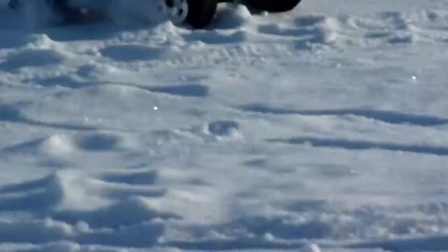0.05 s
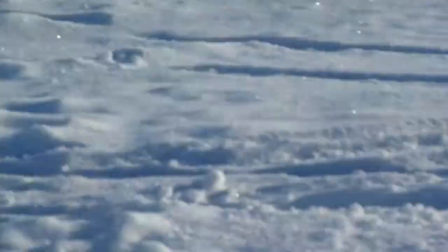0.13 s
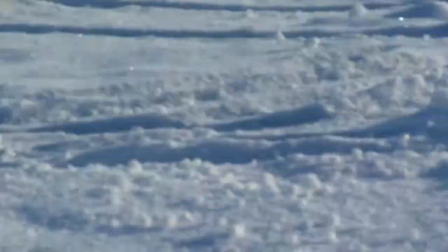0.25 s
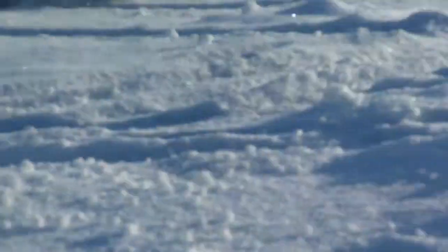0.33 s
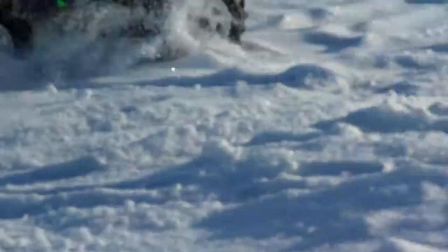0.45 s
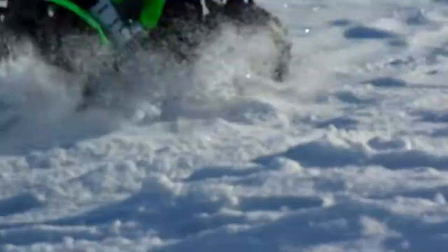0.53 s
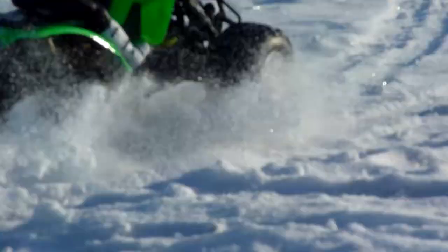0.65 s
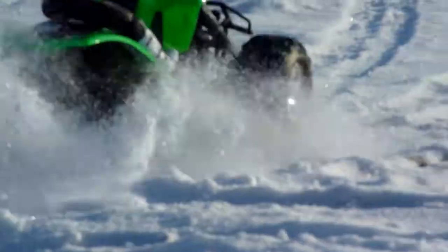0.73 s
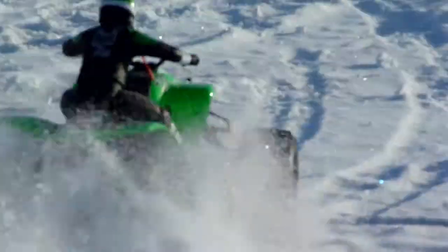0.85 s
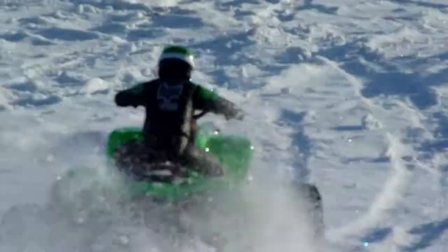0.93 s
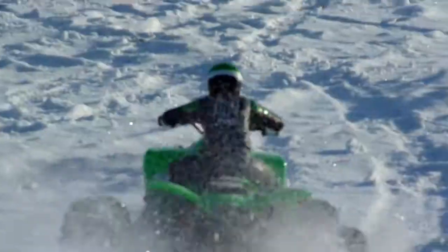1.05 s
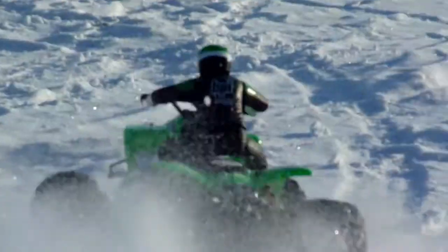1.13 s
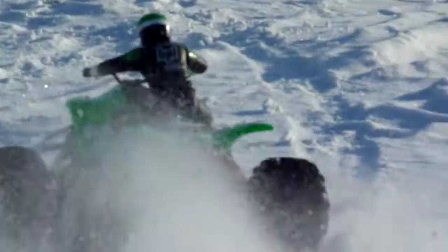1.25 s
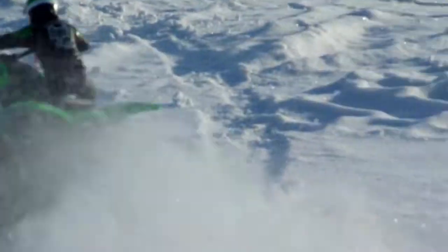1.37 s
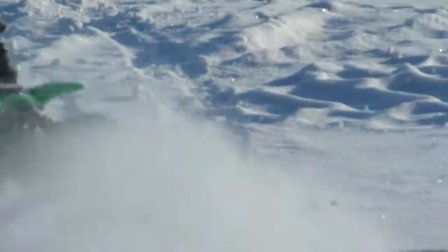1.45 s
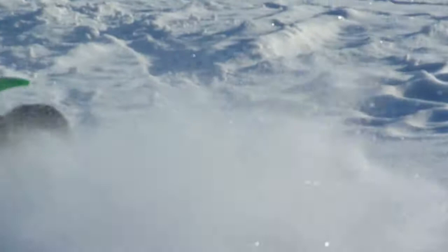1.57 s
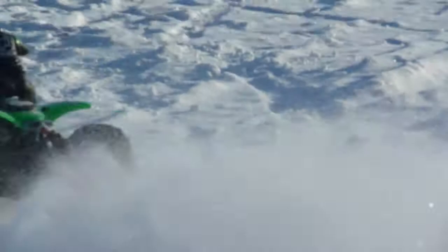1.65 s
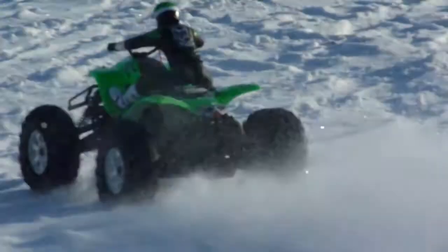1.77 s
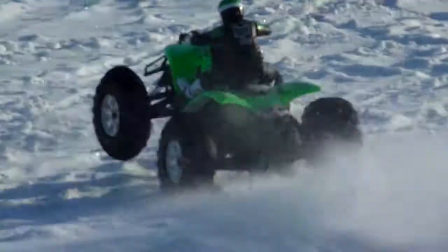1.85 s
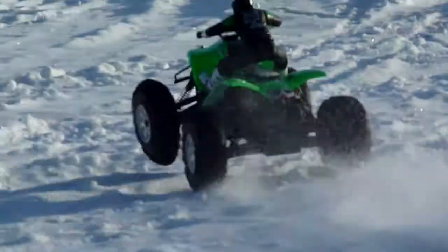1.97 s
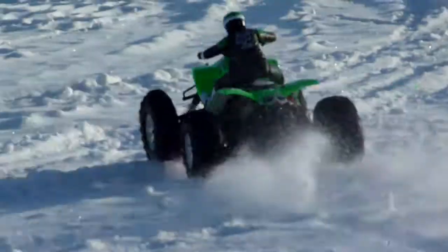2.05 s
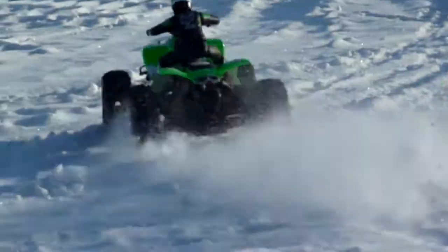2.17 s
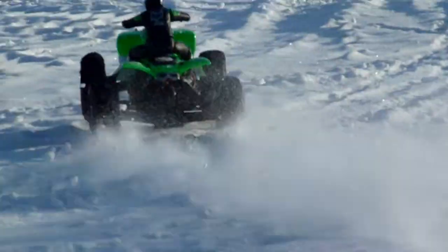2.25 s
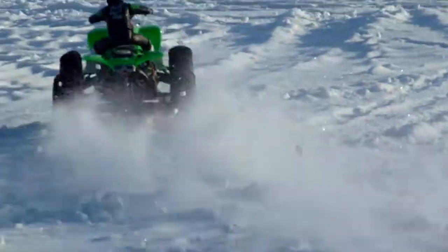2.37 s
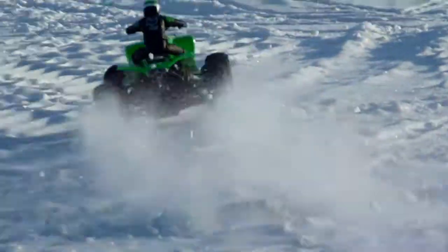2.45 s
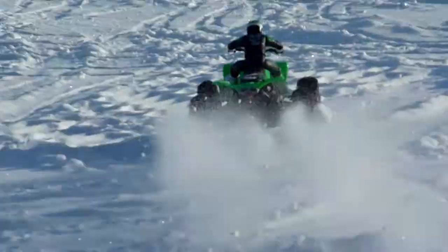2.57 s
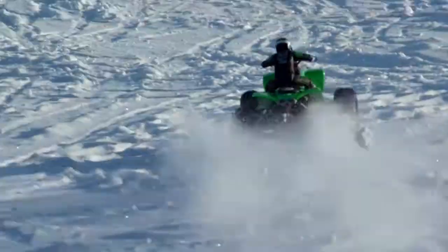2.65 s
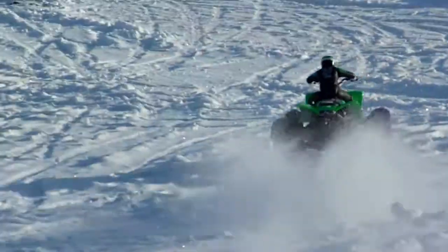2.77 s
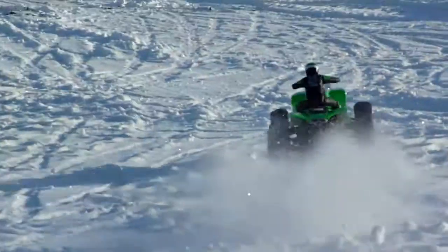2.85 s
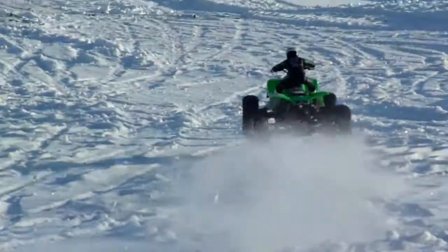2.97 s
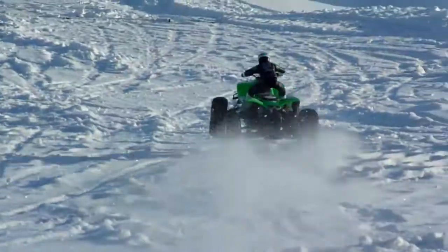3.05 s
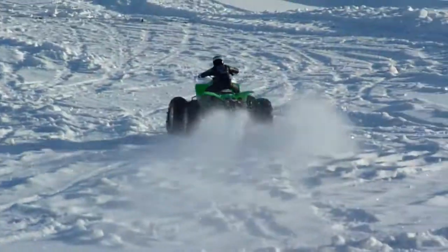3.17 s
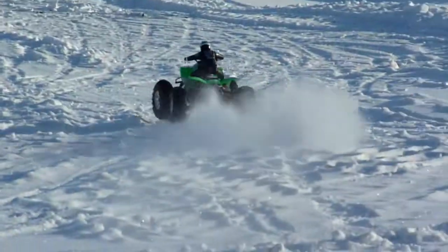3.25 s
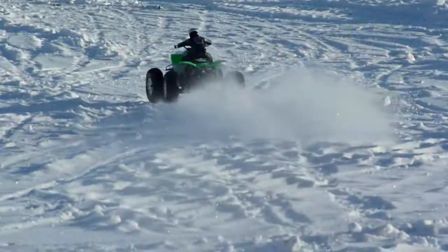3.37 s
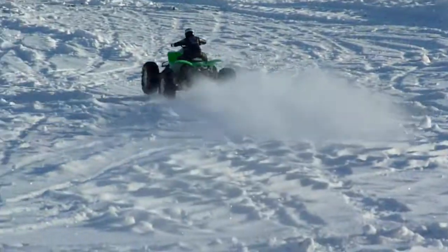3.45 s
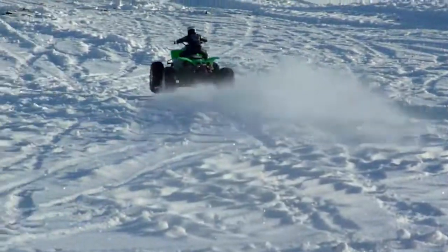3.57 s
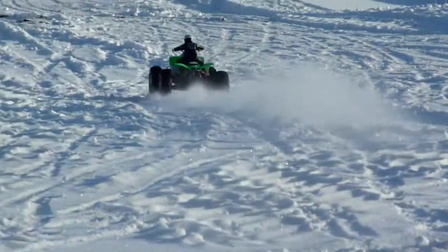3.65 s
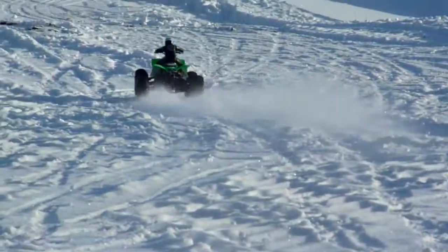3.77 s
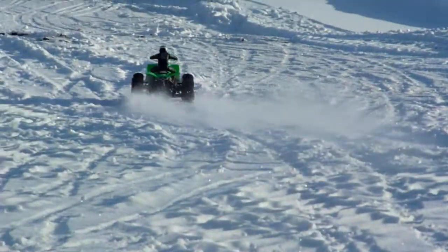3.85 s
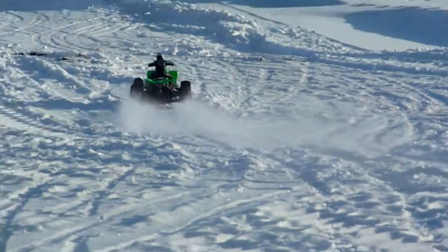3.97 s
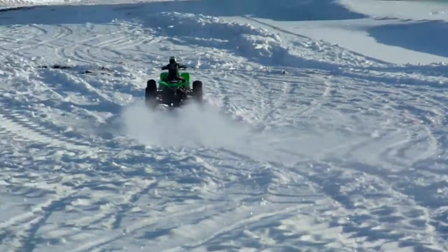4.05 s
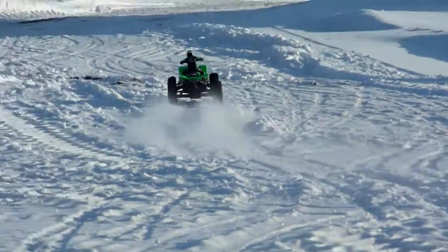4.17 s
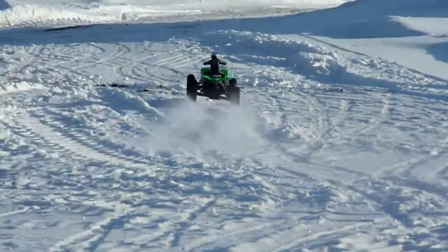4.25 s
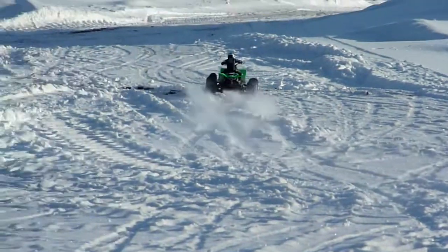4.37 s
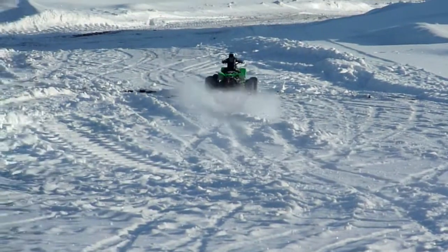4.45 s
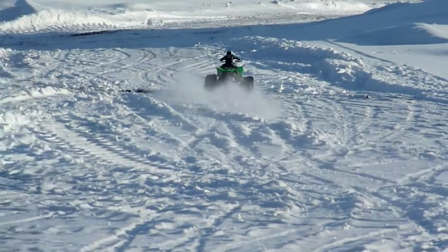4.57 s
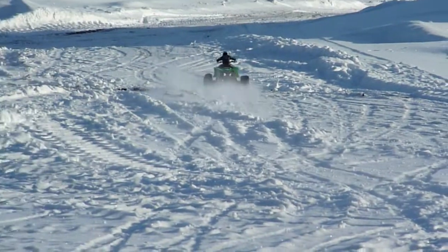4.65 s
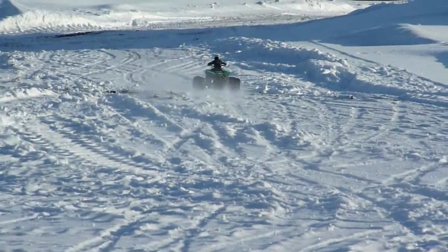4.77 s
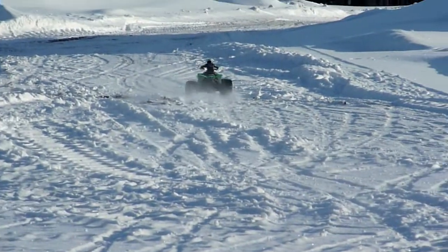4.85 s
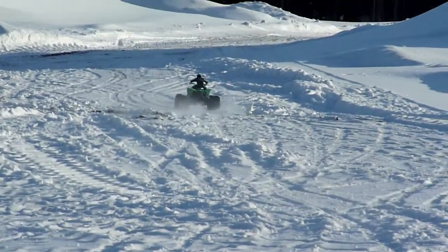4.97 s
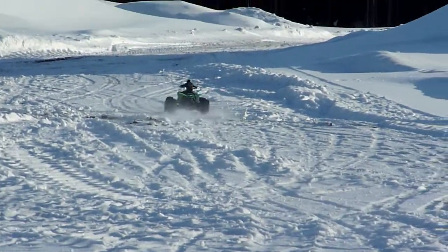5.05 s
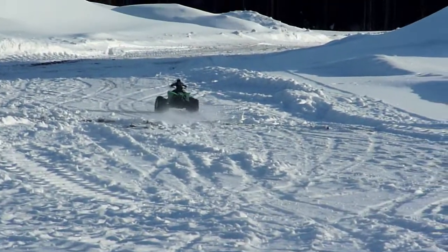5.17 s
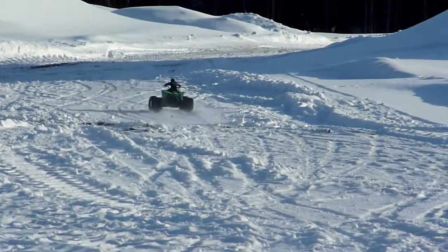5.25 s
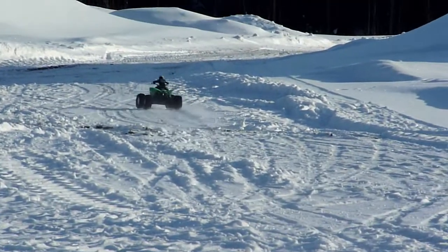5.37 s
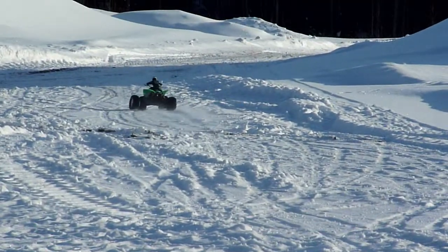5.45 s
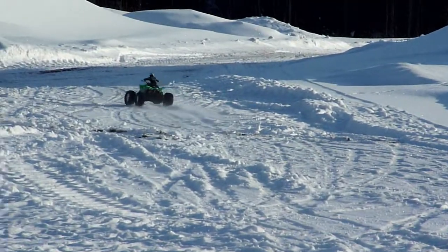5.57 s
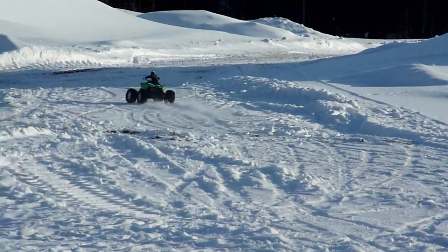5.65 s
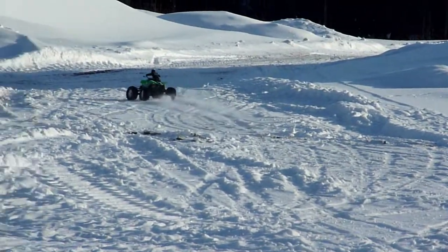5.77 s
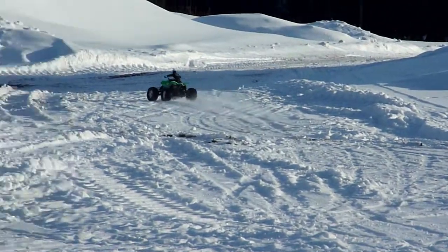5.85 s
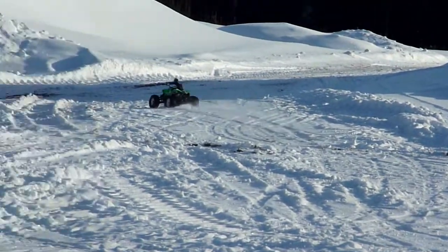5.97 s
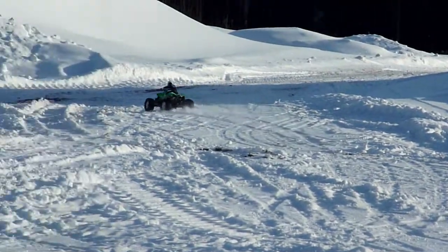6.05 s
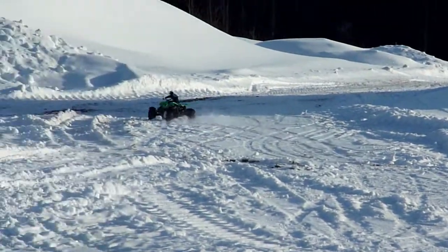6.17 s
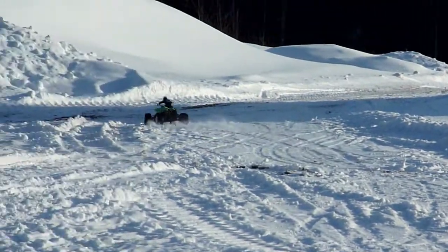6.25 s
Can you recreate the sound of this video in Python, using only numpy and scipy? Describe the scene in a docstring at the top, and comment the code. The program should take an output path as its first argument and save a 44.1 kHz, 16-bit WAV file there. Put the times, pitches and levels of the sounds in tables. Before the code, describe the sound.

Close stereo microphone in open snowy ground. A toy-sized electric vehicle clatters past, briefly revs weakly, then opens up hard with buzzing, grating gear teeth, unsteady mesh whine and low tyre thumps in crunching snow. The sustained noise fades with distance for about four seconds, then drops abruptly into a short run-down with dull little knocks. Taps on the microphone housing and even, close motor ticks follow over quiet air.

```python
"""A small electric off-road model coasts past on snow, with a rattling suspension and one short weak burst.
Then the throttle opens wide with a jolt: the wheels spin, plastic gear teeth chatter into the chassis, the
mesh whines now and then, tyres churn and thump in the snow, and the model drives away.
When the throttle closes, the chatter runs down and the suspension rattles out, duller from behind.
At the end a small motor near the microphone ticks over the steady outdoor hush."""
import sys
import numpy as np
from scipy import signal
from scipy.fft import rfft, irfft
from scipy.io import wavfile
from scipy.ndimage import uniform_filter1d

SR = 44100
rng = np.random.default_rng(int(sys.argv[2]) if len(sys.argv) > 2 else 0)


def inscribe(sig):
    """Save sig as 16-bit PCM at rate SR to the path in sys.argv[1].

    A 1-D sig is mono; a 2-D sig holds one channel per row.
    Samples are clipped to [-1, 1] before scaling.
    """
    pcm = np.round(np.clip(np.atleast_2d(sig).T, -1, 1) * 32767)
    wavfile.write(sys.argv[1], SR, pcm.astype(np.int16))


N = 278712


def amp(db):
    """Turn dB into gain."""
    return 10 ** (np.asarray(db) / 20)


def rms_one(x):
    """Scale to an rms of 1."""
    return x / np.sqrt(np.mean(x ** 2) + 1e-20)


def even(x):
    """Hold the level, averaged over a fifth of a second, at 1; the first row sets the gain for all."""
    slow_power = uniform_filter1d(np.atleast_2d(x)[0] ** 2, size=SR // 5)
    return x / np.sqrt(slow_power + 1e-20)


def in_time(rows):
    """Draw straight lines between table rows: one curve per column after the time."""
    s, *columns = np.transpose(rows)
    return [np.interp(np.arange(N) / SR, s, c) for c in columns]


def at_hz(points, hz):
    """Read a spectrum table on a logarithmic pitch axis."""
    f, v = np.transpose(points)
    return np.interp(np.log(hz + 1), np.log(f + 1), v)


def bumps(rows):
    """Add up bell-shaped swells or dips, in dB."""
    t = np.arange(N) / SR
    return sum(db * np.exp(-(2 * (t - s) / length) ** 2) for s, length, db in rows)


def drift(rate_hz):
    """Smooth random wandering with an rms of 1; a higher rate wanders faster."""
    r = np.exp(-80 * np.pi * rate_hz / SR)
    # made at one point per 40 samples; the first 2000 points let the filter settle
    noise = rng.standard_normal(N // 40 + 2002)
    slow = signal.lfilter([1], [1, -2 * r, r * r], noise)[2000:]
    return np.interp(np.arange(N) / 40, np.arange(len(slow)), rms_one(slow))


def resonate(x, hz, width_hz):
    """Ring like one resonance, with a gain of about 1 at its peak."""
    r = np.exp(-np.pi * width_hz / SR)
    feedback = [1, -2 * r * np.cos(2 * np.pi * hz / SR), r * r]
    return signal.lfilter([(1 - r * r) / 2, 0, (r * r - 1) / 2], feedback, x)


def grains(per_s, spread_db, channels):
    """Scatter single-sample contacts at random times, with uneven size and random sign."""
    size_db = spread_db * np.minimum(rng.exponential(1, (channels, N)), 5)
    sizes = amp(size_db) * rng.choice([-1, 1], (channels, N))
    return sizes * (rng.random((channels, N)) < per_s / SR) + 1e-18


# where the model is: t/s, distance [m], share of its tail toward the listener [0-1], treble level/dB
PATH = [(0, 2.16, 0.3, -1), (.3, 1.95, 0.25, -1.5), (.5, 2.5, 0.2, 6), (.72, 1.98, 0.1, 6),
        (1.1, 2.06, 0.18, -2), (1.6, 1.93, 0.22, 2.5), (2.5, 1.96, 0.63, -3), (3.1, 2.45, .95, -6),
        (3.65, 4.14, 0.96, -3), (4.6, 4.43, 1, -5), (5.3, 5.5, 0.98, 2)]


def path():
    """Follow the model as it turns and leaves: distance, tail share and treble level over time."""
    return in_time(PATH)


# colour of the open air: f/Hz, level/dB (relative, per Hz)
AIR = [(25, -9), (145, 0.5), (427, -7), (677, 0.5), (1300, -7), (1900, -12), (2600, -7.5), (4250, -16.5),
       (5500, -22), (6600, -12), (7920, -19), (14400, -30), (16000, -38)]
# how alike left and right are in the open air: f/Hz, likeness [1 = same, 0 = unrelated]
LIKENESS = [(60, 0.77), (950, 0.78), (3770, 0.021), (15000, 0.16)]
AIR_DB = -56.5


def air():
    """A far, steady outdoor hush: shaped noise, with left and right less alike where the table is low."""
    hz = np.fft.rfftfreq(N, 1 / SR)
    mid, side = rfft(rng.standard_normal((2, N))) * amp(at_hz(AIR, hz))
    alike = np.clip(at_hz(LIKENESS, hz), -1, 1)
    pair = np.sqrt(1 + alike) * mid + np.sqrt(1 - alike) * side * [[1], [-1]]
    return amp(AIR_DB) * rms_one(irfft(pair, N))


# short taps on the microphone housing; the last, at 5.3005 s, is a faint tick of the small motor:
# t/s, level/dB (before the shell rings), left over right level/dB
HOUSING_TAPS = [(4.4994, -35, -8), (4.6092, -31, -5), (4.9872, -35, -4), (4.9957, -34, -6),
                (5.3005, -43, 0)]


def housing_taps():
    """Short taps, and one faint motor tick, make the microphone's shell ring in two broad resonances."""
    taps = np.full((2, N), 1e-18)
    for s, db, pan_db in HOUSING_TAPS:
        at = round(s * SR) + np.array([2, 0])      # left comes two samples late
        taps[[0, 1], at] = amp([db + pan_db / 2, db - pan_db / 2])
    return amp(12.5) * resonate(taps, 2800, 3500) + amp(15) * resonate(taps, 1700, 700)


TICK_START_S, TICK_GAP_S = 5.4425, .0594      # the evenly spaced ticks
TICK_HZ, TICK_DB, GRIT_DB = 1780, -14.5, -43      # levels before the shell rings


def motor_ticks():
    """A small motor inside the shell steps evenly; each step rings as a pulse with grit on it."""
    steps = np.full(N, 1e-18)
    at = (np.arange(TICK_START_S, N / SR, TICK_GAP_S) * SR).astype(int)
    steps[at] = amp(rng.normal(0, 0.87, len(at)))
    grind = signal.lfilter(np.hanning(SR // 120), [1], steps)      # a short swell after each step
    grit = amp(GRIT_DB) * grind * rng.standard_normal(N)
    ticks = resonate(resonate(amp(TICK_DB) * steps + grit, TICK_HZ, 420), TICK_HZ, 700)
    return np.array([np.roll(ticks, shift=3), ticks])      # the motor sits nearer the right port


# ice chips strike the plastic: t/s, level/dB at the top of the swell, f/Hz
CHIPS = [(.482, -43, 4800), (.6945, -29, 6200)]


def chips():
    """Each chip strikes the plastic and rings for a few milliseconds."""
    t, out = np.arange(N) / SR, 0
    for s, db, hz in CHIPS:
        u = (t - s) * hz / 4      # the ring is strongest after four cycles
        swell = np.maximum(u, 0) * np.exp(1 - np.abs(u))
        out = out + amp(db) * swell * np.sin(2 * np.pi * hz * t)
    return out


# wheels thump on lumps; the two high rows near 5.11 s are short crunches of snow:
# t/s, level/dB at the top of the push, f/Hz
THUMPS_AND_CRUNCHES = [(.6915, -22.5, 484), (.793, -22, 216), (.844, -23.5, 268), (.954, -27, 611),
                       (1.631, -22.5, 215), (1.898, -23, 154), (2.151, -25, 230), (2.52, -31, 256),
                       (2.573, -26, 298), (2.628, -29, 260), (3.201, -33, 243), (4.625, -43, 232),
                       (4.758, -39.5, 196), (4.938, -46.5, 190), (5.048, -40, 187), (5.07, -42, 190),
                       (5.108, -47, 1150), (5.12, -46, 760), (5.243, -48, 150), (5.3, -50, 190)]
PUSH_RISE_CYCLES, PUSH_ROUGH = 1.6, .4      # rough = share of crushing noise


def thumps_and_crunches():
    """A soft push dies in a few cycles, with crushing noise under it: low in a tyre, high in crunching snow."""
    out, t = np.zeros(N), np.arange(SR // 10) / SR
    noises = rng.standard_normal((len(THUMPS_AND_CRUNCHES), len(t)))
    for (s, db, hz), noise in zip(THUMPS_AND_CRUNCHES, noises):
        u = t * hz / PUSH_RISE_CYCLES
        push = (u * np.exp(1 - u)) ** 2
        crush = rms_one(resonate(resonate(noise, hz, 260), hz, 420))
        body = (1 - PUSH_ROUGH) * np.sin(2 * np.pi * hz * t) + PUSH_ROUGH * crush
        at = round(s * SR)
        out[at:at + len(t)] += amp(db) * push * body
    return out


# tyres in snow: t/s, rumble level/dB, crunch level/dB above the rumble
SNOW = [(0, -39, -5.5), (.65, -44.5, 1), (.83, -34.5, -1.5), (1.04, -40.5, 1.5), (1.8, -36.5, 0.5),
        (3.0, -43, -4.5), (3.7, -49.5, -9.5), (4.55, -52, -4.5), (5.0, -60.5, -2.5), (5.3, -61, -5),
        (5.5, -76, 2)]
# boom of the hollow tyres: f/Hz, width [Hz], level/dB side-on, level/dB from behind (relative)
RUMBLE = [(60, 74, -24, -7.5), (109.6, 81, -6.5, -0.5), (202, 145, -1, 0), (281, 172, 1, -3),
          (412, 191, -2, -10)]
# crunch of the snow: f/Hz, width [Hz], level/dB (relative)
CRUNCH = [(600, 159, 2.5), (822, 144, 4), (1150, 550, -8)]
# wheels hop clear and the rumble drops out: t/s of the centre, length [s], rumble change level/dB
HOPS = [(2.09, 0.077, -6), (3.15, 0.077, -13)]


def tyres():
    """Snow crushes in lumps under the treads and booms in the hollow tyres, deeper from behind."""
    rumble_db, crunch_db = in_time(SNOW)
    _, away, _ = path()
    crush, crack = grains(2500, spread_db=3.5, channels=4).reshape(2, 2, N)
    boom, crunch = 0, 0
    for k, (hz, width_hz, side_db, behind_db) in enumerate(RUMBLE):
        mode = resonate(resonate(crush, hz, 2 * width_hz), hz, width_hz)
        boom = boom + (-1) ** k * amp(side_db + away * (behind_db - side_db)) * mode
    for k, (hz, width_hz, db) in enumerate(CRUNCH):
        crunch = crunch + (-1) ** k * amp(db) * resonate(crack, hz, width_hz)
    lumps = drift(37)
    boom = amp(bumps(HOPS) + 2.13 * lumps) * even(boom)
    crunch = amp(crunch_db + 1.0 * lumps) * even(crunch)
    stop = np.clip((SNOW[-1][0] - np.arange(N) / SR) / .3 + 1, 0, 1)      # fades over 0.3 s after the last row
    return stop * amp(rumble_db) * (boom + crunch)


# gear mesh whine: t/s of the start, length [s], first f/Hz, last f/Hz, arch in the middle [Hz],
# level/dB before swell and flutter, pitch jitter [share]
WHINE = [(0.201, .14, 2850, 2950, -1, -45, .015), (.725, 0.066, 4700, 4470, -4, -30, .04),
         (1.101, .35, 4070, 4160, 0, -40.5, .04), (1.682, 0.33, 2387, 2425, 100.5, -37, .008),
         (2.02, .17, 3900, 4000, 60, -38.5, .03), (2.24, .25, 4050, 4780, 260, -37, .014),
         (2.725, .08, 3180, 3130, 3, -37, .015), (2.965, .11, 3130, 3150, -2, -36, .02),
         (3.42, .19, 3430, 3560, 30, -40, .012), (3.645, .2, 3380, 3380, 200, -41.5, .009),
         (3.81, .28, 4830, 4830, 0, -46, .02), (3.88, .18, 3480, 3290, 90, -44.5, .009)]
WHINE_FADE_S = 0.023
PINION_TEETH, PINION_WOBBLE = 7, .7      # the tone swells once a turn, which gives side tones
WHINE_BREAK_DB = 110      # level flutter per unit of jitter


def whine():
    """The mesh tone follows wheel speed in short arched glides; slipping wheels jitter it into a rough band."""
    out, t = np.zeros(N), np.arange(N) / SR
    for s, length, first_hz, last_hz, arch_hz, db, jitter in WHINE:
        u = np.clip((t - s) / length, 0, 1)
        hz = first_hz + (last_hz - first_hz) * u + arch_hz * np.sin(np.pi * u)
        hz = hz * (1 + jitter * drift(15 + 2000 * jitter))
        phase = 2 * np.pi * np.cumsum(hz) / SR
        fade = np.clip(np.minimum(u, 1 - u) * length / WHINE_FADE_S, 0, 1)
        level = np.sqrt(2) * amp(db + WHINE_BREAK_DB * jitter * drift(20))
        turn = 1 + PINION_WOBBLE * np.sin(phase / PINION_TEETH)
        out += fade * level * turn * np.sin(phase)
    return out


# short knocks: suspension rattling, and a jolt at 0.718 s as the throttle opens:
# t/s, level/dB before the grip changes
KNOCKS = [(.007, -43), (.03, -46), (0.066, -37.5), (0.093, -36.5), (0.109, -36.5), (.163, -42), (.226, -40),
          (.262, -34), (0.434, -46.5), (.598, -54), (.652, -50), (.718, -29), (4.8559, -43), (5.021, -53.5),
          (5.0624, -48.5), (5.1686, -52), (5.2545, -58), (5.4046, -53.5), (5.4914, -55), (5.67, -58)]
KNOCK_NEAR_S, KNOCK_FAR_S = .002, .021      # knock length side-on and from behind


def knocks(away):
    """Power of the suspension rattle and the jolt: bells in time that smear when heard from behind."""
    t = np.arange(N) / SR
    length = KNOCK_NEAR_S + away * (KNOCK_FAR_S - KNOCK_NEAR_S)
    return sum(amp(2 * db) * np.exp(-(2 * (t - s) / length - 1) ** 2) for s, db in KNOCKS)


# throttle bursts: t/s of opening, t/s of closing, gear chatter level/dB at 1 m before bites and grip
THROTTLE = [(-.2, -0.0036, -23.5), (.165, .385, -39), (.69, 4.71, -23)]
SPIN_UP_S, SHUT_S = 0.041, 0.017
# on closing: a quick drop, then a slower run-down
COAST_DROP_DB, COAST_FADE_DB, COAST_FADE_S = 13, 21.5, 0.48


def throttle():
    """Power of the gear chatter at 1 m: spin-up, hold, quick drop, slow run-down."""
    t, power = np.arange(N) / SR, 0
    for opens, closes, db in THROTTLE:
        since = np.maximum(t - closes, 0)
        drop_db = COAST_DROP_DB * (1 - np.exp(-since / SHUT_S))
        fade_db = COAST_FADE_DB * (1 - np.exp(-since / COAST_FADE_S))
        spin_up = np.clip((t - opens) / SPIN_UP_S, 0, 1) ** 4
        power = power + spin_up * amp(2 * (db - drop_db - fade_db))
    return power


def teeth():
    """Two pairs of rows of dense tooth contacts, plus separate sparser contacts that ring as short squeaks."""
    dense = grains(9000, spread_db=3.0, channels=4)
    sparse = grains(900, spread_db=2.5, channels=1)[0]
    dealt = rng.integers(0, 36, N)      # which of 36 squeak pitches each sparse contact sets off
    squeaks = 0
    for k, hz in enumerate(np.geomspace(1200, 15000, num=36)):
        squeaks = squeaks + resonate(sparse * (dealt == k) + 1e-18, hz, 30 + 0.002 * hz)
    squeaks = amp(-10) * rms_one(squeaks) * [[1], [0], [1], [0]]      # only in the direct rows
    return (rms_one(dense) + squeaks).reshape(2, 2, N)


# chassis and gearbox resonances: f/Hz, width [Hz], level/dB side-on, level/dB from behind (relative)
CHASSIS = [(1300, 200, -12, -18), (1640, 220, -6, -8.5), (2430, 300, 0, 1.5), (3050, 300, -2.5, 1),
           (3480, 200, -4, -3), (4030, 360, -1, -2.5), (4750, 400, -2, -5), (5600, 600, -8, -11),
           (6500, 500, -3, -4), (7200, 500, -7, -7), (8700, 1000, -8.5, -11), (10300, 800, -6.5, -9),
           (12000, 1500, -9, -14), (13900, 550, -5, -9), (14900, 700, -6, -11)]
# the wheels bite (+) or spin free (-): t/s of the centre, length [s], chatter change level/dB
BITES = [(.27, 0.072, 6), (.76, 0.1, 2.5), (.91, 0.083, -4.5), (.98, .06, 2), (1.62, 0.17, 3.5),
         (2.0, .04, 3.5), (3.3, 0.33, 2), (4.68, 0.12, -3.5)]
TREBLE_FROM_HZ, KNOCK_FAR_TREBLE_DB = 5200, -9      # from behind the knocks are duller


def gears():
    """Tooth contacts ring the chassis; row 0 comes direct, row 1 scattered off the snow."""
    metres, away, treble_db = path()
    contacts, low, high = teeth(), 0, 0
    for k, (hz, width_hz, side_db, behind_db) in enumerate(CHASSIS):
        # every panel is shaded and bared as the body pitches and yaws
        db = side_db + away * (behind_db - side_db) + 2.2 * drift(5) + hz / 7000 * drift(20)
        mode = amp(db) * resonate(contacts[k % 2], hz, width_hz) * (-1) ** (k // 2)
        if hz < TREBLE_FROM_HZ:
            low = low + mode
        else:
            high = high + mode
    chatter = throttle() * amp(2 * bumps(BITES)) / metres ** 2
    knock = knocks(away)
    low_power = chatter + knock
    high_power = chatter + knock * amp(2 * away * KNOCK_FAR_TREBLE_DB)
    grip = amp(0.47 * drift(57))      # grip comes and goes
    return grip * (np.sqrt(low_power) * even(low) + np.sqrt(high_power) * amp(treble_db) * even(high))


# microphone ports: f/Hz, lead of the left [radians, before the widening in scene()]
PORTS = [(0, 0.5), (2930, -0.39), (3790, -0.23), (4650, -0.73), (5860, 1), (6460, -0.77), (8700, 0.3),
         (11000, -1.12), (14000, 0.59)]
# balance of the ports: f/Hz, left over right level/dB
PORT_BALANCE = [(200, -1.4), (2400, -1.2), (4400, 1.1), (15000, .3)]
GROUND_DIP_HZ = 1915


def scene():
    """Two close ports hear the model with its ground reflection, then the housing and the air."""
    drive = gears()
    grazing = np.clip(0.44 + 0.41 * path()[1], 0, 1)      # the dip deepens as the tail turns to us
    dipped = signal.lfilter(*signal.iirnotch(GROUND_DIP_HZ, 4.0, SR), drive)
    direct, scattered = drive + grazing * (dipped - drive) + tyres()
    direct = direct + whine() + thumps_and_crunches() + chips()
    hz, sides = np.fft.rfftfreq(N, 1 / SR), np.array([[1], [-1]])
    lead = 1.1 * at_hz(PORTS, hz)      # widened
    ports = amp(sides * at_hz(PORT_BALANCE, hz) / 2) * np.exp(1j * sides * lead / 2)
    # the scattered share grows with pitch and has opposite sign in the two ports
    wet = amp(at_hz([(100, -34), (1000, -22.0), (10000, -9.5)], hz))
    model = irfft(ports * rfft(direct) + sides * wet * rfft(scattered), N)
    return model + housing_taps() + motor_ticks() + air()


HOUSING_DIP_HZ, CUTOFF_HZ = 7970, 16100


def record(dry):
    """The housing leaves a narrow dip, and a steep low-pass cuts the top."""
    notched = signal.lfilter(*signal.iirnotch(HOUSING_DIP_HZ, 14.0, SR), dry)
    shaded = 0.67 * notched + .25 * dry
    return signal.sosfilt(signal.cheby2(24, 75, CUTOFF_HZ, fs=SR, output="sos"), shaded)


dry = scene()
out = record(dry)
inscribe(out)
```